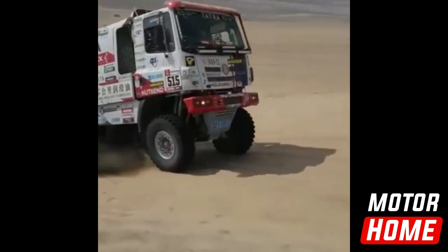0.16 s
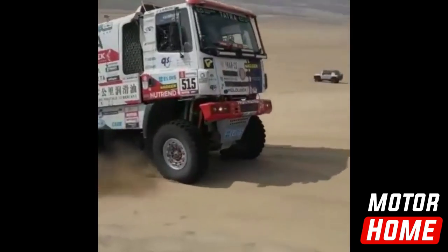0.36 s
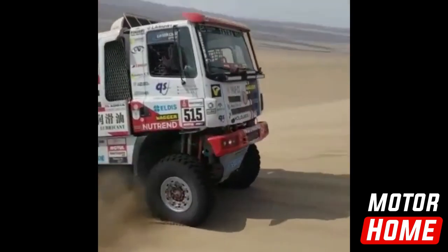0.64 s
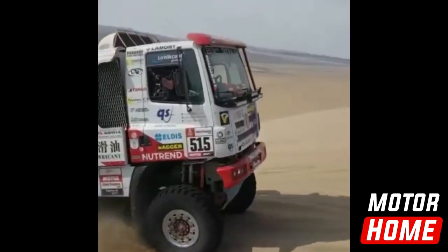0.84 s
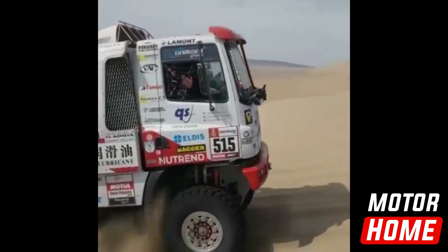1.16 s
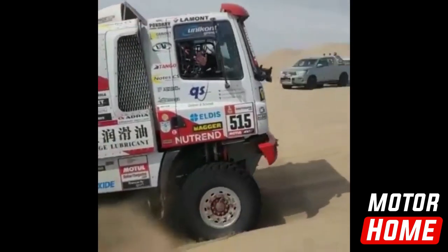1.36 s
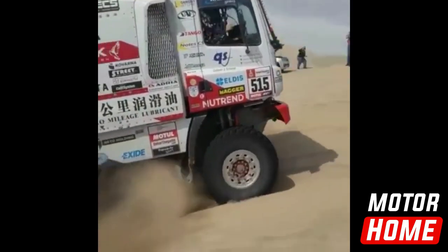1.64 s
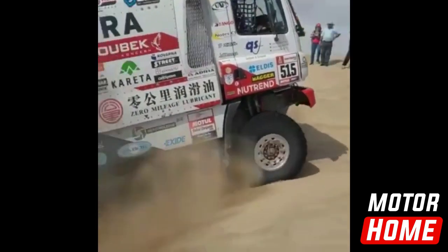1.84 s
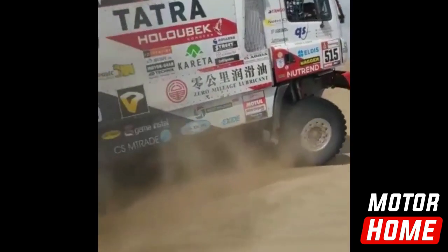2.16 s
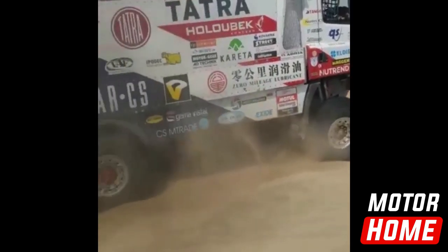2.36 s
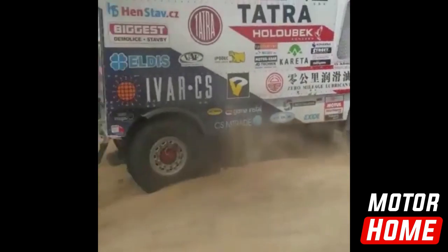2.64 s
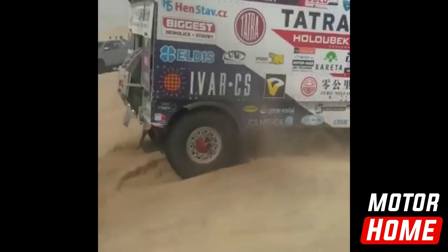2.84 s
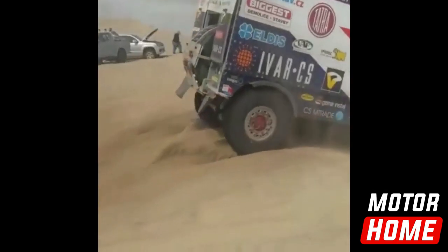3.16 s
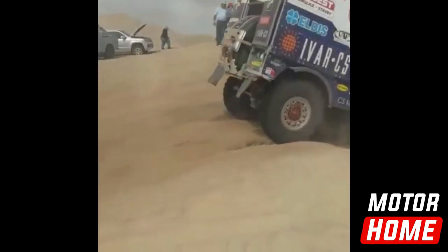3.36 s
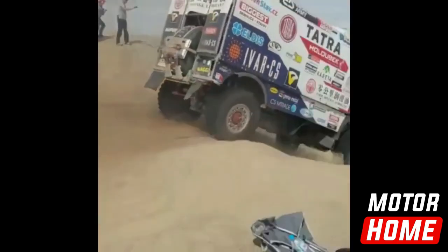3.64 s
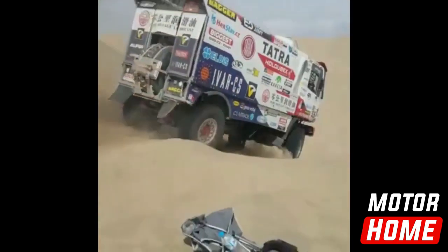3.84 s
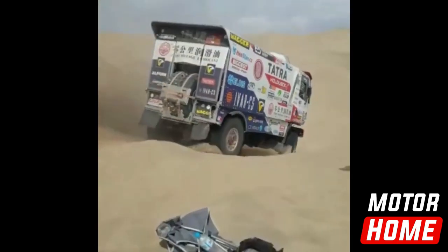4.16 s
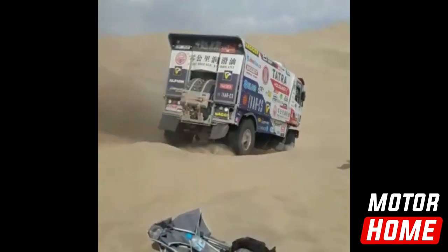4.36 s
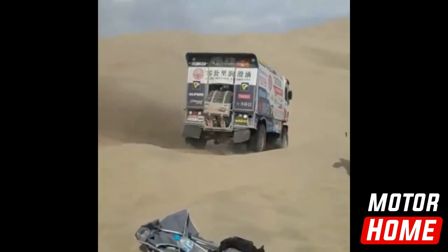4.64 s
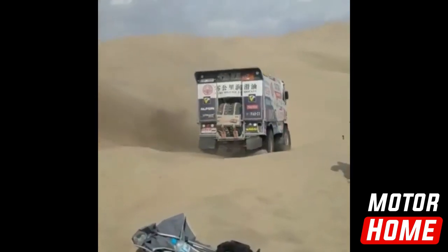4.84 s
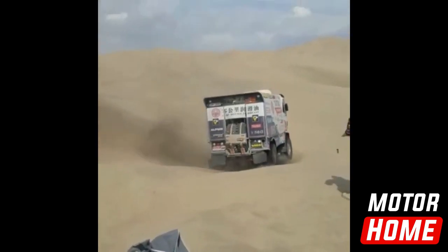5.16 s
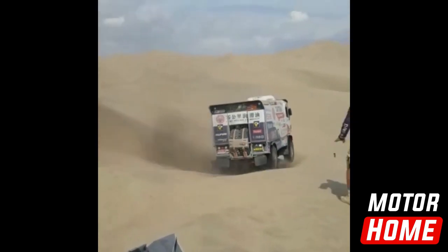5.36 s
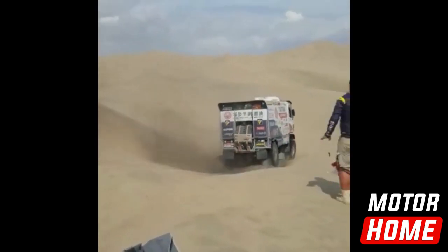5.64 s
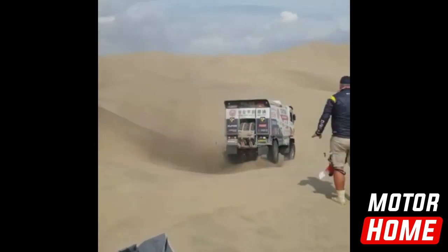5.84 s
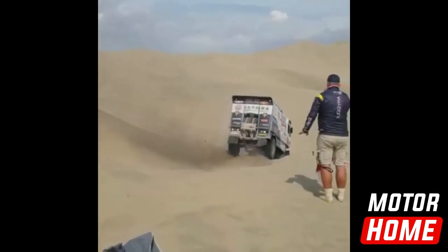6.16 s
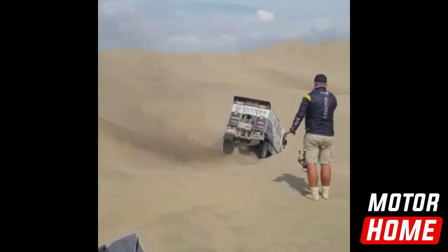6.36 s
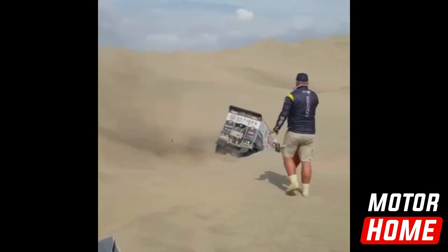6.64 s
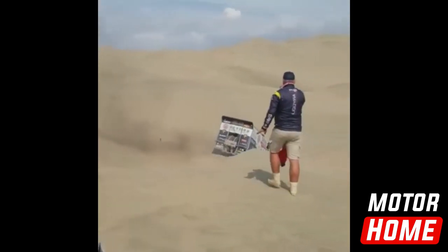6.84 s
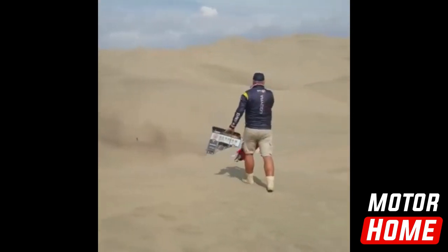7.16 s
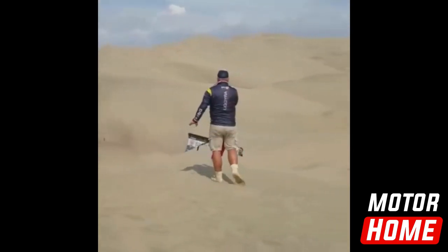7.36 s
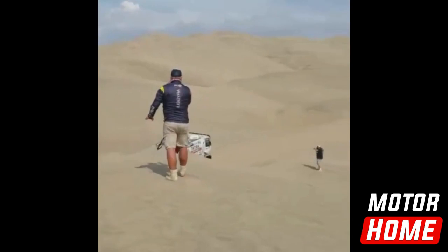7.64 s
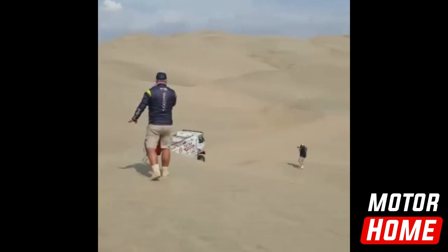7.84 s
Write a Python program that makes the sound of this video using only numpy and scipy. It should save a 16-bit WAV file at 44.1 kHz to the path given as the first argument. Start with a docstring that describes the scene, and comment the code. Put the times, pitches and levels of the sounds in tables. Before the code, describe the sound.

A diesel rally truck labours past with a rasping, crackling exhaust, then drones away while sand hisses and wind buffets the microphone.

```python
"""Rally truck in the dunes

A diesel truck labours past through soft sand, revving up and down, and drives away over a crest.
Each firing of its engine sends a puff down the exhaust, and the puffs make a drone and a rasp.
The turbo whistles, the pipe backfires, the chassis squeaks and the tyres throw hissing sand.
Gusts buffet the microphone, most of all once the truck has passed."""
import sys
import numpy as np
from scipy import signal
from scipy.fft import rfft, irfft
from scipy.io import wavfile
from scipy.ndimage import uniform_filter1d

SR = 44100
rng = np.random.default_rng(int(sys.argv[2]) if len(sys.argv) > 2 else 0)


def bounce(signal):
    """Save signal as a 16-bit WAV file at the path given by the first command-line argument."""
    frames = np.transpose(np.atleast_2d(signal))
    limited = np.clip(frames, -1, 1)
    pcm = np.round(limited * 32767).astype(np.int16)
    wavfile.write(sys.argv[1], SR, pcm)


N = 352800
TIME = np.arange(N) / SR

# Levels are relative. "Lug" is how far a straining engine breaks its noise into separate puffs.
# engine speed: (time [s], firing rate of one bank of cylinders [Hz])
REVS = [(0, 92.1), (.12, 94.06), (.3, 88.15), (.48, 84.8), (.7, 96.86), (.92, 110.1), (1.2, 108.5),
        (1.35, 100.1), (1.51, 69.66), (1.63, 63.76), (1.95, 79.1), (2.28, 44.68), (2.645, 42),
        (2.715, 49.6), (3.08, 52.97), (3.3, 41.7), (3.48, 38.93), (3.69, 51.92), (4.03, 65.52),
        (4.33, 53.55), (4.56, 66.45), (4.9, 75.05), (5.2, 66.9), (6.7, 62.9), (7.3, 87.1), (7.5, 88.4),
        (7.83, 110.9), (8, 97.9)]
# what each push on the throttle adds: (start [s], hold [s], rise [s], fall [s], bank tone [dB],
# octave tone [dB], roar [dB], opening bark [dB], rasp [dB], exhaust rumble [dB], lug [0-1])
PUSHES = [(-.2, 1.41, .1, 0.23, 17, 17, 12, 2, 10.5, -14, 0.14),
          (1.53, 0.47, 0.073, 0.098, 11.5, 4, 7, 1, 3, 1, 0.26),
          (2.629, 0.61, 0.02, 0.046, 12, 10, 5, 8, 4.5, 1.5, 0.18),
          (3.578, 0.41, 0.015, 0.22, 8, 8.5, 5.5, 6, 11.5, 1, 0.32),
          (4.35, 0.56, 0.085, 0.1, 14, 12, 11.5, -1, 4, 7.5, 0),
          (7.09, 1.02, 0.071, 0.099, 12.5, 12, -2, 0, -9, -2, 0)]
# what spitting under load adds: (start [s], hold [s], rasp [dB], crack [dB], lug [0-1])
SPITS = [(.33, 0.96, .5, -2, 0.01), (.8, 0.18, 0, 2, 0), (1.239, 0.11, 3.5, -3.5, 0.04),
         (1.64, 0.17, 2, 2, 0.15), (1.83, 0.14, 5, -2, 0), (2.635, 0.2, -2, 2, 0.12),
         (2.975, 0.12, 2.5, 7, 0.22), (3.57, 0.18, -1.5, 1, 0), (3.804, 0.1, 3.5, 6, 0),
         (4.5, 0.12, 3.5, -0.5, 0.12)]
# the truck drops behind a dune and climbs out: (time [s], bank tone [dB], octave tone [dB])
DUNE_SHELTER = [(0, -3, -8.5), (1, -4, -9), (1.42, -1, -9.5), (1.75, -2.5, -2.5), (4.95, 0, -4),
                (5.1, -12, -10), (5.4, -13, -14.5), (5.7, -28, -27), (6.2, -32, -30), (6.6, -11, -21),
                (7.2, -12, -21), (8, -8, -24)]
# the coasting exhaust as the truck goes by: (time [s], roar [dB], rasp [dB])
DRIVE_BY = [(0, -35, -37.5), (.6, -31.5, -30), (1.3, -38, -28.5), (1.6, -34.5, -28), (2.15, -32.5, -32),
            (2.6, -33.5, -31), (3.35, -30.5, -36), (4.3, -31, -35), (4.9, -37, -34), (5.2, -39, -41.5)]
# how the exhaust pipe passes a tone: (frequency [Hz], level [dB])
PIPE_RESPONSE = [(40, -38), (50, -48), (58, -37.5), (66, -38), (75, -34), (90, -29), (110, -29.5),
                 (130, -26), (150, -27.5), (168, -20), (185, -24), (203, -28.5), (220, -27.5)]
# how the muffler passes the overtones: (frequency [Hz], level [dB])
MUFFLER = [(110, -4.5), (170, 2), (250, 1), (310, 2.5), (370, -4.5), (470, 0.5), (540, 1), (630, -2.5),
           (720, -6), (850, -14.5), (1100, -18), (1400, -10)]
# three unequal cylinders give the overtones a repeating pattern: (level [dB])
CYLINDER_DB = [-4, 3, -5]
# tone colours of the exhaust's noises and the engine block's clatter: (frequency [Hz], level [dB])
ROAR_COLOUR = [(20, -22.5), (45, -13), (90, -8), (180, 6), (280, 0.5), (390, -6), (560, -1), (800, -7.5),
               (1300, -8), (1800, -9), (3500, -15.5), (8000, -45)]
RASP_COLOUR = [(600, -19), (1200, -9.5), (1700, -11.5), (2400, -5.5), (3000, -0.5), (3500, 3), (4000, 3),
               (4600, -5), (5300, -12.5), (6200, -37), (8000, -40), (13000, -53.5)]
CRACK_COLOUR = [(3500, -15), (4700, 12), (5700, 6), (7000, -3.5), (8500, -2.5), (10000, -4.5),
                (12500, -20.5), (13500, -33.5)]
CLATTER_COLOUR = [(500, 7), (1000, 4.5), (1500, 5), (2100, 8), (3000, 0.5), (5000, -44)]
# the turbo's whistle: (time [s], pitch [Hz])
TURBO_PITCH = [(0, 12250), (2.1, 12370), (2.3, 11900), (2.58, 9600), (3, 9350), (3.24, 9650), (3.52, 8550),
               (3.8, 8350), (3.97, 8930), (4.08, 9050), (4.4, 8010), (4.9, 10130)]
# its strength: (pitch [Hz], level against the rasp [dB])
TURBO_LEVEL = [(8000, -20), (8600, -21), (9400, -21), (10200, -34), (11500, -20), (12500, -31.5)]
# it flares as the throttle lifts: (middle [s], half length [s], extra level [dB])
TURBO_FLARES = [(3.22, 0.037, 12), (4.032, 0.08, 4.5)]

# where the truck is: (time [s], direction [0 in front, 1 gone by])
BEARING = [(0, 0.74), (.85, 0), (1.3, 0.035), (1.85, 0.19), (2.4, 1), (4.8, .95), (7, 0.63)]
# which side is louder: (frequency [Hz], left minus right [dB])
TRUCK_SIDE = [(40, 13), (200, -4), (400, 3.5), (1200, 3.5), (2200, 3.5), (3300, 19.5), (4200, 7),
              (5500, 1.5), (7400, 8), (13000, -3.5)]
SAND_SIDE = [(1500, 0.5), (2400, 2), (3200, 9.7), (4600, 2.5), (10000, 0.5)]
CENTRED = [(60, 0), (3000, 0)]
# how far the left side leads, with the truck in front and gone by: (frequency [Hz], lead [radians])
LEAD_AHEAD = [(100, -0.35), (400, 0.34), (1500, -0.19), (2800, -0.6), (3400, -0.5), (4100, -0.13),
              (6000, 0)]
LEAD_PAST = [(100, 0), (400, 1.02), (900, 0.7), (1500, 1.5), (2200, 2), (2800, 2), (3400, 2.4),
             (4000, 1.65), (4700, 2), (6000, -0.5)]
# how alike left and right are, for the truck and for the wind: (frequency [Hz], likeness [0-1])
TRUCK_LIKENESS = [(40, .3), (130, 1), (300, 0.74), (800, 0.74), (1500, 0.58), (2200, 0.54), (2800, 0.24),
                  (3400, 0.88), (4100, 0.61), (4700, .2), (6000, .3), (12000, 0.53)]
WIND_LIKENESS = [(40, .17), (130, 0.72), (300, 0.21), (700, 0.46), (1500, .28), (3000, .1)]

# tone colours of the wind and the low rumble: (frequency [Hz], level [dB])
WIND_COLOUR = [(20, -27), (50, -5.5), (120, -1), (230, 0.5), (330, 3), (480, 0.5), (750, -9.5),
               (1200, -18.5), (2000, -21), (4000, -39.5), (9000, -57), (13000, -65)]
RUMBLE_COLOUR = [(20, -30), (45, -10.5), (90, 5.5), (170, -1), (300, -12), (900, -48), (4000, -92)]
# gusts of wind: (middle [s], half length [s], rush [dB], rumble [dB])
GUSTS = [(4.055, 0.12, -32.5, -26.5), (5.044, 0.096, -23, -18), (5.326, 0.11, -36, -36),
         (5.656, 0.15, -39.5, -61), (6.527, 0.13, -34, -43), (6.728, 0.11, -25, -41),
         (6.996, 0.065, -28, -38), (7.21, 0.08, -29, -38), (7.355, 0.06, -26.5, -36),
         (7.5, 0.046, -30.5, -42), (7.679, 0.096, -25.5, -28), (7.966, 0.091, -23.5, -31)]
# backfires as the throttle opens or the engine strains: (time [s], rasp [dB], crack [dB], body [dB])
BACKFIRES = [(2.643, -19.5, -32, -20), (2.667, -20, -35, -22), (2.687, -18, -28.5, -21.5),
             (2.709, -24, -38, -19), (2.728, -22, -36, -25), (2.748, -22.5, -28, -32),
             (2.79, -36, -30, -45), (2.809, -23, -34, -38), (2.868, -24.5, -39, -44),
             (2.928, -24, -41, -24), (2.984, -21.5, -31, -27), (3.022, -23, -39, -32),
             (3.042, -26, -29, -31), (3.16, -42, -44, -24), (3.18, -37, -42, -32), (3.222, -34, -38, -27),
             (3.584, -34, -33, -20), (3.605, -30, -38, -21), (3.626, -27, -31, -21.5),
             (3.664, -21, -34, -45), (3.704, -26, -34, -40), (4.04, -36, -31, -27)]
BACKFIRE_RISE_S = 0.0019
# the hollow body of a backfire: (frequency [Hz], level [dB])
BACKFIRE_COLOUR = [(120, -4), (300, 0.5), (600, -0.5), (1100, -6), (1600, -13), (2400, -16), (4000, -32)]
# the tailpipe's ringing notes: (pitch [Hz], level [dB], time to fall 60 dB [s])
PIPE_NOTES = [(2900, -4, .035), (3440, -2, .04), (3950, -1, .035), (4500, -1, .03), (5200, -12, .022)]
# swirls of air that hit the microphone:
# (time [s], knock [dB], flurry [dB], centre [Hz], length [s], left minus right [dB])
BUFFETS = [(2.76, -24, -20, 600, .006, 17), (2.906, -19, -25, 500, 0.0062, 10),
           (3.247, -23, -26, 550, .005, 10), (3.269, -19, -23, 400, .004, 19),
           (3.282, -25, -21, 450, .005, 14), (3.473, -25, -33, 300, .005, 10),
           (3.587, -10, -19, 130, 0.017, 0), (3.622, -19, -16.5, 251.1, 0.013, 0),
           (3.968, -19, -22, 300, 0.0088, 16), (4.016, -10, -14.5, 170, 0.015, 24),
           (4.159, -17, -19.5, 300, .005, 26), (4.183, -14, -25, 300, 0.0066, 31),
           (4.28, -21, -25, 110, .014, 18), (4.908, -16, -21.5, 700, 0.006, 20),
           (4.958, -14.5, -16, 400, 0.0048, 22), (4.978, -13, -22, 400.5, 0.0046, 19),
           (5.0105, -7.5, -26, 1190, 0.0023, 28), (5.015, -15, -14, 500, 0.0056, 28),
           (5.022, -7, -12.5, 80, 0.016, 29), (5.045, -13, -23, 600, 0.004, 27),
           (5.052, -7, -15.5, 280, 0.0066, 27), (5.083, -20, -24, 450, .003, 27),
           (5.095, -9, -24, 500, 0.0037, 27), (5.099, -25, -17.5, 1030, 0.01, 30),
           (5.104, -5, -24, 110.6, 0.0087, 27), (5.122, -12, -15.5, 265, 0.017, 25),
           (5.147, -16, -19, 804, .006, 28), (5.15, -7, -26, 200, 0.0057, 26),
           (5.157, -18, -20.5, 1200, .005, 24), (5.68, -25, -34, 700, 0.0047, 12.5),
           (6.685, -22, -35, 400, 0.0067, -4), (6.709, -14.5, -20, 520, 0.0096, -8),
           (6.78, -21, -27, 452, 0.006, 3), (6.799, -15.5, -19.5, 438, .012, 8),
           (7.353, -21, -22, 400, 0.012, 20), (7.477, -25, -30, 552, 0.0055, 2),
           (7.529, -22, -31, 500, 0.0049, 4), (7.633, -16, -22.5, 402, 0.0073, .5),
           (7.746, -16, -26.5, 446.4, 0.016, 24), (7.769, -22, -25, 594, 0.011, 22),
           (7.791, -21.5, -27, 1500, .003, 21), (7.932, -20, -25.5, 501.3, 0.011, 17)]
# chassis squeaks: (time [s], pitch [Hz], level [dB], length [s])
SQUEAKS = [(4.131, 2860, -41.5, 0.13), (4.83, 3510, -34.5, 0.04), (4.974, 3630, -38.5, 0.043),
           (5.378, 3480, -50, 0.075), (5.48, 2550, -52, 0.048)]
# sand thrown by the tyres: (middle [s], half length [s], coarse hiss [dB], fine hiss [dB])
SAND_THROWS = [(5.42, 0.4, -45.5, -47.5), (6.36, 0.18, -55, -45), (6.51, 0.13, -48, -40),
               (6.93, 0.19, -38.5, -51), (5.8, 2.04, -59, -54.5)]
# tone colours of the sand: (frequency [Hz], level [dB])
COARSE_SAND = [(590, -45), (1000, -19), (1330, -1.5), (2190, -8.5), (2470, -1), (2750, -7.5), (3460, -2),
               (4750, -4.5), (7020, -38), (9220, -18.5), (12200, -45), (13500, -55)]
FINE_SAND = [(500, 0.5), (1000, 0.5), (1400, 2), (1900, -1), (2500, -17), (3000, -8), (3600, -1),
             (4700, -0.5), (5500, -4), (6600, -11), (8200, -11), (12200, -25), (13500, -34)]
# ringing notes of the truck's metal underside: (pitch [Hz], width [Hz], level [dB])
PANEL_NOTES = [(1880, 70, -3), (2470, 80, -1.5), (3420, 130, 1), (3900, 190, 3), (4450, 230, 0),
               (4890, 130, 0), (5220, 130, -5), (5760, 100, -9.5), (6040, 130, -17), (7500, 160, -15),
               (8160, 220, -10)]
# sand spraying on that metal: (time [s], level [dB])
SPRAY_LEVEL = [(5.8, -70), (6.15, -53), (6.35, -45.5), (6.5, -41), (6.62, -49), (6.9, -40), (7.1, -51),
               (7.3, -67), (8, -79)]
# a whistling hiss as the truck tips over the crest: (time [s], pitch [Hz], level [dB])
CREST_HISS = [(5.8, 4100, -60), (6.05, 4350, -53), (6.2, 4450, -44), (6.28, 4900, -54), (6.345, 5250, -44),
              (6.4, 4700, -44), (6.48, 3950, -43), (6.56, 4800, -46), (6.66, 4700, -45), (6.74, 4600, -40),
              (6.88, 4300, -45), (7.05, 4500, -54), (7.2, 4300, -64)]


def amp(db):
    """Turns decibels into a gain."""
    return 10 ** (np.asarray(db) / 20)


def unit(x):
    """Scales a sound to an average power of 1; for stereo, the average of its two sides."""
    return x / np.sqrt(np.mean(np.atleast_2d(x).mean(0) ** 2) + 1e-20)


def curves(rows):
    """Joins each column of a table with straight lines over time."""
    times, *columns = np.transpose(rows)
    return [np.interp(TIME, times, column) for column in columns]


def look_up(table, hz):
    """Reads a table at a frequency, with every octave equally wide."""
    freqs, values = np.transpose(table)
    return np.interp(np.log(hz + 1), np.log(freqs), values)


def fade(start, end):
    """Goes from 0 at start to 1 at end."""
    return np.clip((TIME - start) / (end - start), 0, 1)


def held(start, length, rise, fall):
    """Rises to 1, stays there and falls back to 0."""
    return fade(start, start + rise) - fade(start + length, start + length + fall)


def swell(middle, half_length):
    """A bell-shaped rise and fall."""
    return np.exp(-np.minimum(((TIME - middle) / half_length) ** 2, 50))


def panned(side_db):
    """Left and right gains that average 1; positive is louder on the left."""
    left = amp(np.atleast_1d(side_db))
    return 2 * np.array([left, np.ones_like(left)]) / (1 + left)


def wander(hz):
    """A smooth random wobble, up to about this fast."""
    freqs = np.fft.rfftfreq(N, 1 / SR)
    return unit(irfft(rfft(rng.standard_normal(N)) * np.exp(-(freqs / hz) ** 2), N))


def noise(colour, patchy_db, side=TRUCK_SIDE, is_wind=False):
    """Stereo noise with a tone colour and drifting louder and softer patches."""
    hz, times = np.fft.rfftfreq(2048, 1 / SR), np.arange(N // 512 + 5) * 512 / SR
    a, b, c, d, patches = rng.standard_normal((5, len(times), len(hz)))
    patches = uniform_filter1d(uniform_filter1d(patches, size=5, axis=0), size=14, axis=1)
    patches = unit(patches.ravel()).reshape(a.shape)
    alike = np.clip(look_up(WIND_LIKENESS if is_wind else TRUCK_LIKENESS, hz), -1, 1)
    left = a + 1j * b
    pair = np.array([left, alike * left + np.sqrt(1 - alike ** 2) * (c + 1j * d)])
    pair *= amp(look_up(colour, hz) + patchy_db * patches) * panned(look_up(side, hz))[:, None]
    if not is_wind:  # sound from the truck reaches one side first
        past = np.interp(times, *np.transpose(BEARING))[:, None]
        lead = (1 - past) * look_up(LEAD_AHEAD, hz) + past * look_up(LEAD_PAST, hz)
        pair[1] *= np.exp(-1j * lead)
    _, sound = signal.istft(pair.transpose(0, 2, 1), nperseg=2048, noverlap=1536)
    return unit(sound[:, :N])


def add(mix, start, sound):
    """Mixes a sound in at a start time."""
    part = mix[:, round(start * SR):][:, :sound.shape[1]]
    part += sound[:, :part.shape[1]]


def count_firings(zero_s=2.642, shudder=.026):
    """Counts one bank's firings, from a moment when the throttle bites; the driveline shudders a bit."""
    firings = np.cumsum(curves(REVS)[0]) / SR
    return firings - np.interp(zero_s, TIME, firings) + shudder * wander(6)


def engine_effort(bark_s=0.032):
    """Throttle, load and the truck's place set the lug and the level of each engine sound in dB."""
    roar, rasp = curves(DRIVE_BY)
    bank, octave = curves(DUNE_SHELTER)
    exhaust_rumble, crack, lug = bank - 35, -11, 0.15  # while coasting
    throttle = 0
    for start, hold, rise, fall, *boosts in PUSHES:
        bank_db, octave_db, roar_db, bark_db, rasp_db, exhaust_rumble_db, depth = boosts
        push = held(start, hold, rise, fall)
        bark = np.exp(-np.maximum(TIME - start - rise, 0) / bark_s)
        throttle += push
        bank += bank_db * push
        octave += octave_db * push
        roar += (roar_db + bark_db * bark) * push
        rasp += rasp_db * push
        exhaust_rumble += exhaust_rumble_db * push
        lug += depth * push
    for start, hold, rasp_db, crack_db, depth in SPITS:
        strain = held(start, hold, rise=0.0054, fall=0.048)
        rasp += rasp_db * strain
        crack += crack_db * strain
        lug += depth * strain
    hz, = curves(REVS)
    bank += look_up(PIPE_RESPONSE, hz)
    octave += look_up(PIPE_RESPONSE, 2 * hz)
    return dict(throttle=throttle, bank=bank, octave=octave, roar=roar,
                rasp=rasp, crack=crack, exhaust_rumble=exhaust_rumble, lug=lug)


def drone(firings, engine):
    """One bank of cylinders hums at its firing rate, both together an octave higher; the tones throb."""
    bank = amp(engine["bank"] + .7 * wander(27)) * np.cos(2 * np.pi * (firings - 2 / 5))
    octave = amp(engine["octave"] + .7 * wander(23)) * np.cos(4 * np.pi * (firings - 1 / 4))
    return np.sqrt(2) * (bank + octave) * panned(np.interp(TIME, [1.5, 3], [.2, 2.2]))


def overtones(firings):
    """Wavering multiples of the engine cycle (three firings) slide through the muffler's resonances."""
    cycle_hz, times, out = curves(REVS)[0][::256] / 3, TIME[::256], 0
    revs_db = 5.5 * np.log2(cycle_hz)  # faster is louder
    for k in range(4, 40):
        waver = unit(uniform_filter1d(rng.standard_normal(len(times)), size=11))
        stagger = unit(uniform_filter1d(rng.standard_normal(len(times)), size=5))
        db = look_up(MUFFLER, k * cycle_hz) + CYLINDER_DB[k % 3] + 4 * waver + revs_db
        gain = np.interp(TIME, times, amp(db) * np.sqrt(cycle_hz))
        phase = np.interp(TIME, times, rng.random() + .05 * stagger)
        out += gain * np.sin(2 * np.pi * (k * firings / 3 + phase))
    return unit(out)


def puffs(firings, depth, uneven_db, blur_s=0.0014):
    """A gain that swells at each firing and dies away; no two puffs are equally strong."""
    strength = amp(uneven_db * rng.standard_normal(1024))[np.floor(firings).astype(int) % 1024]
    age = (firings % 1) / .15
    blur = signal.windows.gaussian(513, blur_s * SR)  # the pipe rounds off each puff
    puff = unit(signal.oaconvolve(strength * age ** 2 * np.exp(-2 * age), blur, "same"))
    depth = np.clip(depth, 0, 1)
    power = (1 - depth) ** 2 + depth ** 2 + 2 * depth * (1 - depth) * puff.mean()
    return (1 - depth + depth * puff) / np.sqrt(power)


def exhaust_and_block(firings, engine):
    """Firings and backfires make the exhaust growl, roar, rasp and crack, while the block clatters."""
    lug = engine["lug"]
    pop_rasp, pop_crack, pop_body = backfires()
    near, far = fade(5.02, 4.946), amp(engine["bank"]) * fade(6.8, 6.9)
    blow = amp(engine["rasp"] - 1.6) * fade(5.4, 5.12)
    coasting_db = 4 * np.minimum(engine["throttle"] - 1, 0)
    growl_gain = amp(engine["roar"] - 2 - 5 * lug + coasting_db) * near + amp(-14) * far
    growl = overtones(firings + .006 * wander(40)) * growl_gain * panned(2)
    roar = noise(ROAR_COLOUR, patchy_db=2) * puffs(firings, 0.35 * lug, uneven_db=1)
    roar *= amp(engine["roar"] - 5.7 + 3 * lug) * near
    pulses = puffs(firings + .03 * wander(60), .86 * lug, uneven_db=1.8) * amp(1.2 * wander(500))
    rasp = noise(RASP_COLOUR, patchy_db=1.9) * np.hypot(pulses * blow, pop_rasp)
    crack = noise(CRACK_COLOUR, patchy_db=4.5)
    sharp_pulses = puffs(firings, 1.1 * lug - .2, uneven_db=4, blur_s=0.0007)
    crack *= np.hypot(sharp_pulses * amp(engine["crack"] - 1) * blow, pop_crack)
    front = amp(np.interp(TIME, [0, 1.3, 2.6], [-1.5, -3.5, -17]))  # clatter is loudest from the front
    clatter = noise(CLATTER_COLOUR, patchy_db=3.5, side=[(100, 1.2), (4000, 0.77)])
    clatter *= pulses * (front * blow + amp(-27) * far)
    body = noise(BACKFIRE_COLOUR, patchy_db=4) * pop_body
    return growl + roar + rasp + crack + clatter + body


def turbo(rasp_db, lag_s=0.019):
    """A fuzzy whistle climbs and sinks with the boost, and frays into hiss at top speed."""
    hz, = curves(TURBO_PITCH)
    fray_hz = np.interp(hz, [9500, 12000], [130, 400])
    pitches = [hz + fray_hz * wander(500) + 60 * wander(25) for _ in range(2)]
    whistle = np.sin(2 * np.pi * np.cumsum(pitches, axis=1) / SR)
    flutter = amp(3 * wander(160) + 3.6 * wander(20))
    flare_db = sum(db * swell(middle, half) for middle, half, db in TURBO_FLARES)
    level_db = np.interp(TIME - lag_s, TIME, rasp_db) + flare_db + look_up(TURBO_LEVEL, hz)
    return unit(whistle * flutter) * amp(level_db) * panned(np.interp(TIME, [2, 2.7], [-7, 4]))


def wind(breeze_db=-43):
    """Rough air rushes over the microphone, hardest on the left, and sputters as the gusts rise."""
    gusts = sum(amp(db) ** 2 * swell(middle, half) for middle, half, db, _ in GUSTS)
    level_db = 10 * np.log10(amp(breeze_db) ** 2 + gusts)
    sputter_db = np.interp(level_db, [-48, -30], [2, 3.2])
    lumps = unit(amp(sputter_db * wander(140)))
    side_db = np.interp(TIME, [5.15, 5.5, 6.7, 7.8], [11.6, 6.2, 2.5, 6.04])
    air = noise(WIND_COLOUR, patchy_db=3, side=CENTRED, is_wind=True)
    return air * lumps * amp(level_db - 3.5) * panned(side_db)


def rumble(exhaust_rumble_db, breeze_db=-56):
    """Low rumble from the gusts and from the exhaust, swelling with the throttle."""
    gusts = sum(amp(db) ** 2 * swell(middle, half) for middle, half, _, db in GUSTS)
    power = amp(breeze_db) ** 2 + amp(exhaust_rumble_db) ** 2 + gusts
    low_noise = noise(RUMBLE_COLOUR, patchy_db=3.5, side=CENTRED, is_wind=True)
    side_db = np.interp(TIME, [0, 2.6, 4.85, 5.05, 5.5], [1.9, 11, 10, 18, 7.5])
    return low_noise * np.sqrt(power) * panned(side_db)


def backfires(hold_s=0.0049, decay_s=0.0056):
    """Gains for the backfires' rasp, crack and body: a snap, a short hold and a quick fade."""
    out, t = np.zeros((3, N)), np.arange(2048) / SR
    burst = np.minimum(t / BACKFIRE_RISE_S, 1) * np.exp(-np.maximum(t - hold_s, 0) / decay_s)
    for start, *levels_db in BACKFIRES:
        add(out, start, amp(levels_db)[:, None] * burst)
    return out


def pipe_rings():
    """Each backfire rings the tailpipe, at slightly different pitches and levels every time."""
    out, t = np.zeros((2, N)), np.arange(2048) / SR
    for start, rasp_db, _, _ in BACKFIRES:
        for hz, db, ring_s in PIPE_NOTES:
            scatter, detune, phase = rng.standard_normal(3)
            angle = 2 * np.pi * (hz * (1 + .04 * detune) * t + phase)
            shape = np.minimum(t / BACKFIRE_RISE_S, 1) * np.exp(-np.log(1000) * t / ring_s)
            ring = np.sin([angle, angle - look_up(LEAD_PAST, hz)]) * shape
            gain = amp(rasp_db - 6 + db + 2 * scatter)
            add(out, start + BACKFIRE_RISE_S, gain * ring * panned(look_up(TRUCK_SIDE, hz)))
    return out


def buffets():
    """Each swirl of air gives a knock and a short flurry; smaller swirls snap at a higher pitch."""
    out, t, hz = np.zeros((2, N)), np.arange(4096) / SR, np.fft.rfftfreq(4096, 1 / SR)
    for start, knock_db, flurry_db, centre_hz, length, side_db in BUFFETS:
        shared, own = rng.standard_normal(len(t)), rng.standard_normal((2, len(t)))
        treble_cut = 1 / np.sqrt(1 + (hz / min(3.3 * centre_hz + 300, 3300)) ** 6)
        band = hz / (1 + (hz / centre_hz) ** 2) ** 1.92
        age, angle = 3 * t / length, 2 * np.pi * centre_hz * t
        flurry = unit(irfft(rfft(shared + .5 * own) * treble_cut * band)) * age * np.exp(1 - age)
        pressure = np.roll(angle * (2 - angle) * np.exp(-angle), 44)
        knock = irfft(rfft(pressure) * treble_cut)
        sound = amp(knock_db) * knock / knock.max() + amp(flurry_db) * flurry
        add(out, start - .001, sound * panned(side_db))
    return out


def squeaks():
    """The chassis twists over the ridges and gives short, rough squeaks."""
    out, waver = np.zeros((2, N)), wander(248)
    for start, hz, db, length in SQUEAKS:
        count = int(length * SR)
        pitch = hz * (1 + .036 * waver[int(start * SR):][:count])
        tone = np.sin(2 * np.pi * np.cumsum(pitch) / SR)
        add(out, start, amp(db + 11) * tone * np.hanning(count) * panned(18))
    return out


def thrown_sand():
    """Coarse and fine sand hiss in uneven swells behind the tyres."""
    hiss = 0
    for grade, colour in enumerate([COARSE_SAND, FINE_SAND]):
        power = sum(amp(dbs[grade]) ** 2 * swell(middle, half) for middle, half, *dbs in SAND_THROWS)
        hiss += noise(colour, patchy_db=3.2, side=SAND_SIDE) * np.sqrt(power)
    clumps = amp(1.4 * wander(300) + .7 * wander(35))
    return hiss * clumps * fade(5.1, 5.122)


def sand_on_metal(grains_per_s=2500):
    """Grains of sand strike the metal underside and blend into a ringing rush."""
    t, out = np.arange(2048) / SR, 0
    for hz, width_hz, db in PANEL_NOTES:
        grains = (rng.random(N) < grains_per_s / SR) * rng.standard_normal(N)
        angle = 2 * np.pi * hz * t
        ring = np.sin([angle, angle - look_up(LEAD_PAST, hz)]) * np.exp(-np.pi * width_hz * t)
        out += amp(db) * signal.oaconvolve(grains[None], ring / np.linalg.norm(ring), axes=1)[:, :N]
    surges = amp(1.5 * wander(30))
    return unit(out) * surges * amp(curves(SPRAY_LEVEL)[0]) * panned(2.6)


def crest_hiss(spread_hz=180):
    """A narrow band of hiss slides up and down, almost a whistle."""
    hz, db = curves(CREST_HISS)
    band = (wander(spread_hz) + 1j * wander(spread_hz)) * np.exp(2j * np.pi * np.cumsum(hz) / SR)
    pair = np.array([band, band * np.exp(-1j * look_up(LEAD_PAST, hz))]).real
    return unit(pair) * amp(db - 1) * panned(5.5)


def scene():
    """Truck, sand and wind in the open desert, with no echo."""
    firings, engine = count_firings(), engine_effort()
    truck = drone(firings, engine) + exhaust_and_block(firings, engine) + pipe_rings()
    truck += turbo(engine["rasp"]) + squeaks()
    sand = thrown_sand() + sand_on_metal() + crest_hiss()
    return truck + sand + wind() + rumble(engine["exhaust_rumble"]) + buffets()


def record(dry):
    """Rounds off the highest peaks and cuts the treble above 13100 Hz."""
    over = np.maximum(abs(dry) - .7, 0)
    rounded = dry - np.sign(dry) * (over - .23 * np.tanh(over / .23))
    treble_cut = signal.firwin(255, cutoff=13100, window=("kaiser", 8), fs=SR)
    return signal.oaconvolve(rounded, treble_cut[None], "same")


dry = scene()
out = record(dry)
bounce(out)
```